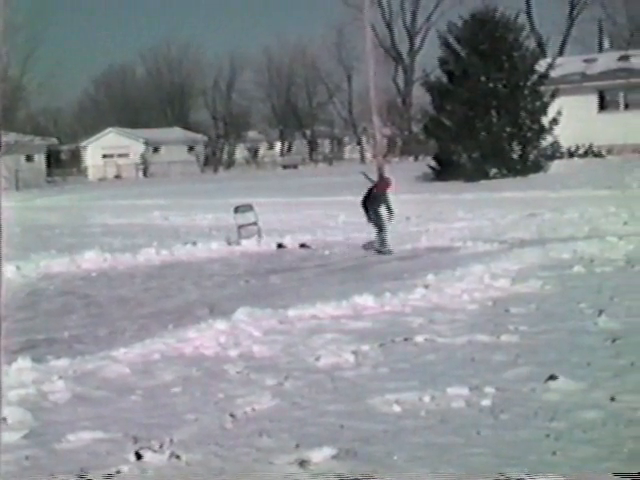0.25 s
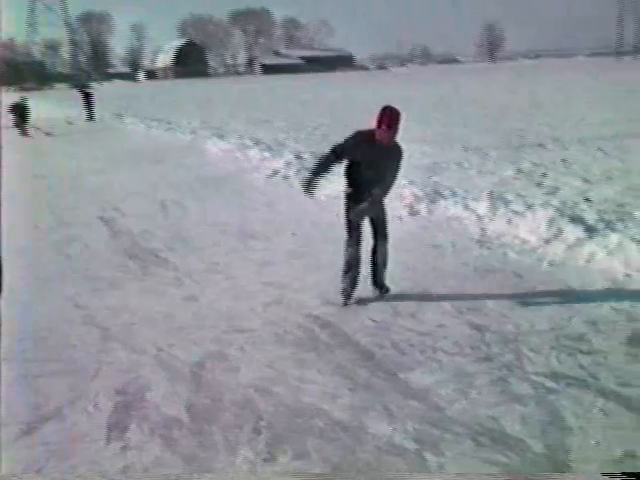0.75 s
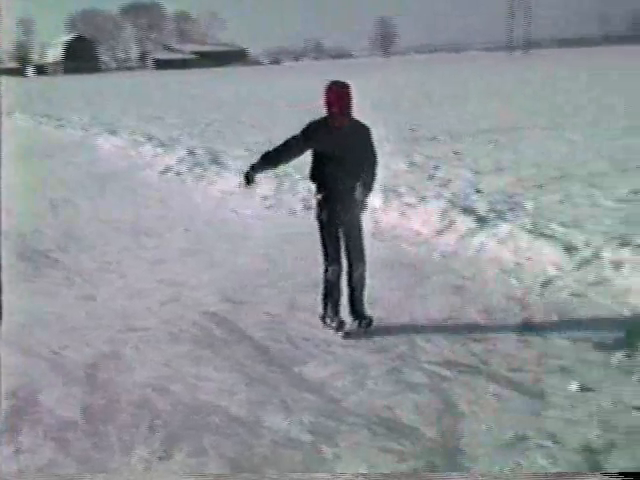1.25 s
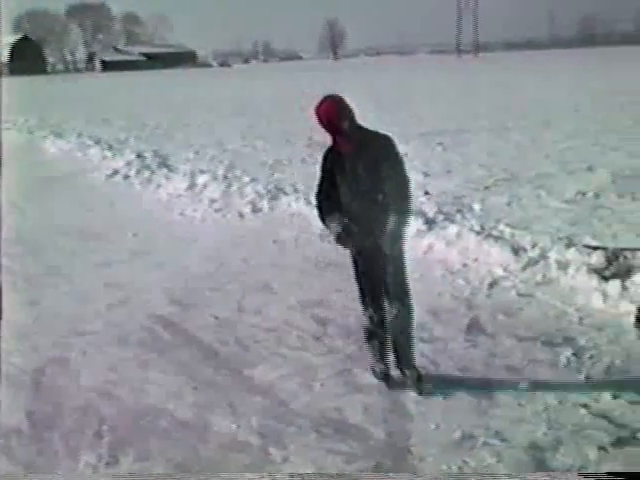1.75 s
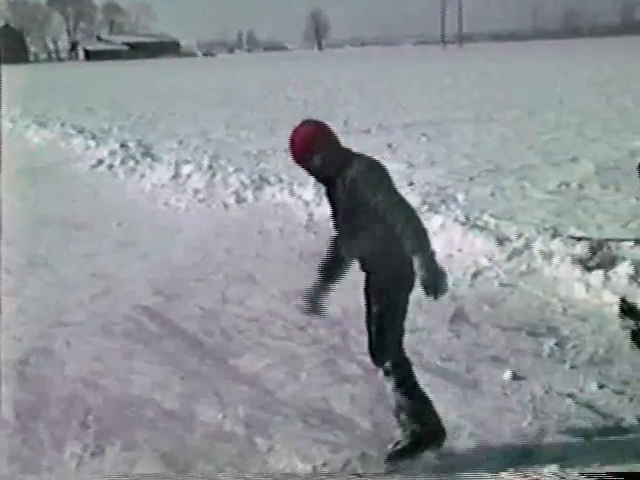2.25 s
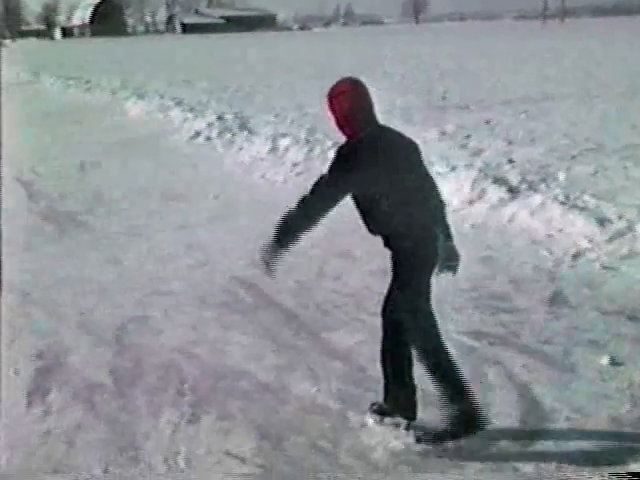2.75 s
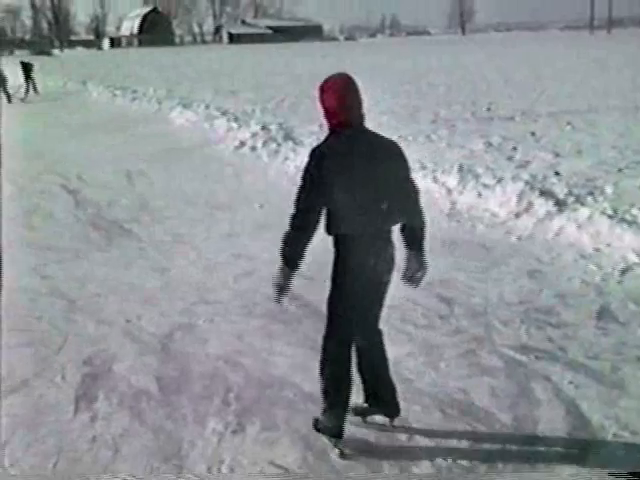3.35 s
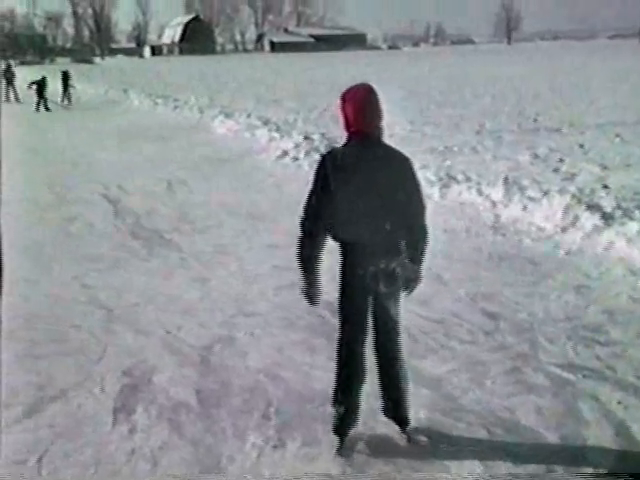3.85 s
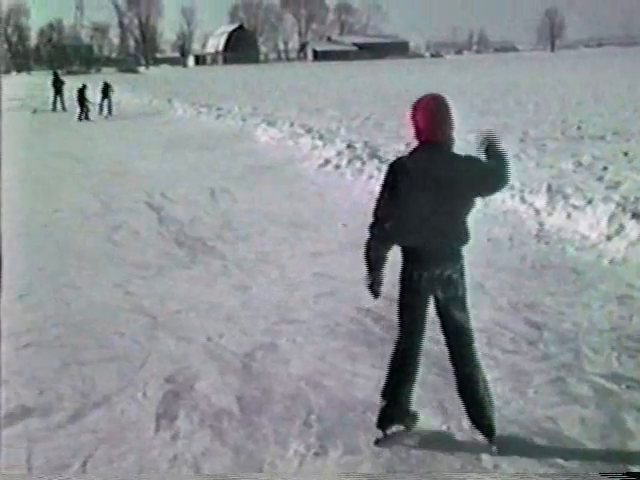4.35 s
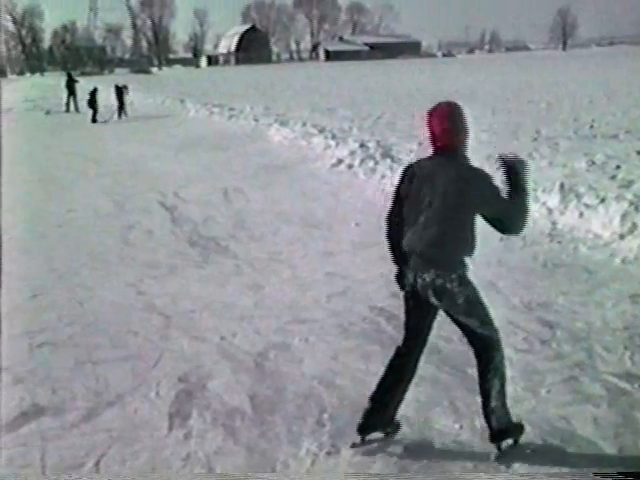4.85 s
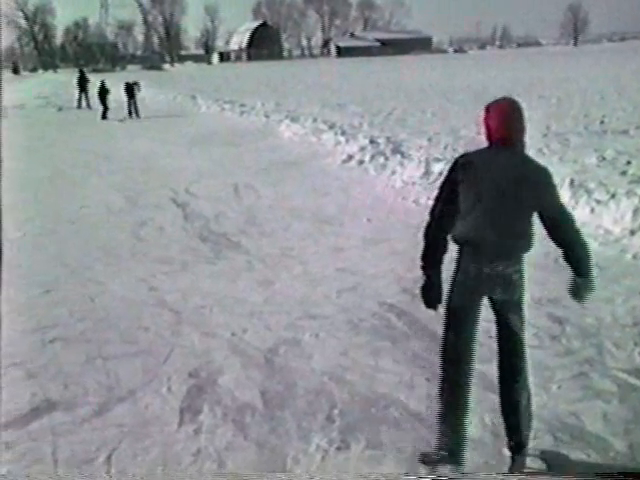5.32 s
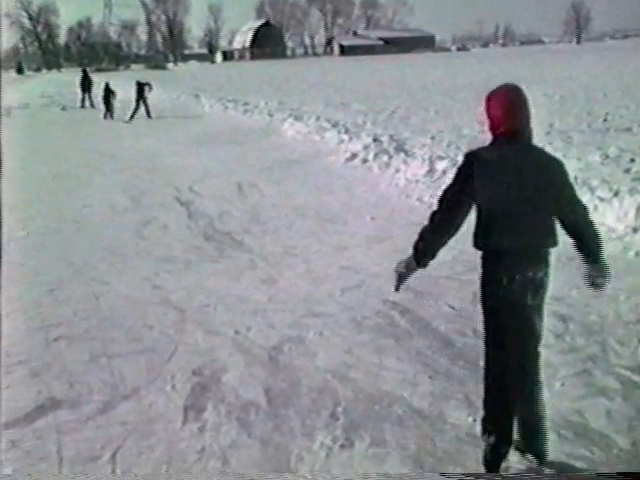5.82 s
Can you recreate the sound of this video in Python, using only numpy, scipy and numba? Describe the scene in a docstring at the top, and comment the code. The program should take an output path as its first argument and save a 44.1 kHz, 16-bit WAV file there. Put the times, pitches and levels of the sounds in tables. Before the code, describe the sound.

Metal blades rasp on bumpy ice, close and dry, without echo. Faint scratching grows into thumping steps and one loud crunchy carve, eases to thin shaving, then becomes a run of short knocking strokes. Bright hard cracks ring out late, followed by a few more scrapes. Behind are soft wind rumble, distant open-country noise, hiss and a thin steady whine from an old tape camcorder.

```python
"""A skater shuffles and carves over rough pond ice a few metres from a tape camcorder on an open snowy field.
Soft shaving and a first step lead to a strong carve after two seconds, then to shorter, knocking strokes.
Sharp cracks ring out just after five seconds, and the last strokes follow. The blade sounds are noise through
resonances of ice, boot and blade; knocks and cracks are short blows that ring. All the way through there are
light wind and far country noise (filtered noise), tape hiss, and thin whine and drive tones (sine waves)."""
import sys
import numpy as np
from scipy import signal
from scipy.io import wavfile
from scipy.ndimage import uniform_filter1d
from numba import njit

SR = 44100
rng = np.random.default_rng(int(sys.argv[2]) if len(sys.argv) > 2 else 0)


def put_to_file(sound):
    """Save the sound as 16-bit audio at rate SR, in the file named by the first command-line argument."""
    columns = np.atleast_2d(sound).T  # one column per channel
    safe = np.clip(columns, -1, 1)
    whole_steps = np.round(safe * 32767)
    wavfile.write(sys.argv[1], SR, whole_steps.astype(np.int16))


N = 268282  # length in samples

# Resonances of the ice sheet, the boot, and the ice that the blade crushes, shaves and sprays.
# Columns: pitch_hz [Hz], base_width_hz [Hz, widened where used], level_db [dB, relative]
SHEET = [(171, 86, -9.5), (284, 102.5, -4.5), (340.6, 76, -0.5), (413, 74, -4.5)]
BOOT = [(663, 110, 1), (826.6, 180, -2)]
CRUST = [(1116, 180, 2), (1506, 300, 0), (2133, 490, -5.5), (2657, 370, -11)]
POWDER = [(3230, 317, 2.5), (4010, 350, 0.5), (4470, 150, 3), (4740, 250, -11)]
SPRAY = [(5630, 800, 2), (7270, 1100, -8.5), (8600, 1700, -8)]


def undb(db):
    """Turn decibels into a gain."""
    return 10 ** (np.asarray(db) / 20)


def level(x, db):
    """Scale a sound to an rms (average strength) level."""
    return x * undb(db) / np.sqrt(np.mean(x ** 2))


@njit
def svf(x, hz, width):
    """Let one band through: a state-variable filter whose centre may move, with gain 1 at the centre."""
    y = np.empty(len(x))
    band, low = 0., 0.
    for i in range(len(x)):
        g = np.pi * hz[i] / SR
        g += g ** 3 / 3  # close to tan(g)
        damping = width / hz[i]
        v = (band + g * (x[i] - low)) / (1 + g * (g + damping))
        band = 2 * v - band
        low = low + 2 * g * v
        y[i] = damping * v
    return y


def svf_twice(x, centre, width):
    """Pass the same band filter twice, for steeper sides."""
    return svf(svf(x, centre, width), centre, width)


def walk(rate):
    """Wander at random: levels held for 1 / rate seconds, then smoothed twice; spread near 1."""
    hold = max(int(SR / rate), 1)
    steps = np.repeat(rng.standard_normal(N // hold + 1), hold)
    smoothed = uniform_filter1d(uniform_filter1d(steps, hold), hold)
    return 1.23 * smoothed[:N]


def add(out, s, sound, db):
    """Mix a sound in at a time in seconds, scaled to a peak level."""
    start = int(s * SR)
    n = min(len(sound), N - start)
    out[start:start + n] += sound[:n] * undb(db) / np.abs(sound).max()


def glide():
    """The blade bumps over ridges: one shared judder shakes all layers, the spray hardest and the powder least."""
    settle_db = -33  # under a thud near this loud the blade bites in and judders less
    settled = 0.5    # share of the judder left under a very loud thud
    gains = strokes()
    pressure = (gains[0] / undb(settle_db)) ** 2
    judder = walk(90) * (settled + (1 - settled) / (1 + pressure))

    ridges = grains(800, 2.53, 0.59)
    chips = grains(3000, 2.3, 0.75)

    def layer(judder_db, source, peaks, drift, sway_db):
        return level(undb(judder_db * judder) * body(source, peaks, drift, sway_db), 0)

    thud = layer(2.4, ridges, SHEET, 0.012, 1.4)
    boot = layer(2.6, ridges + 0.37 * chips, BOOT, 0.038, 2.2)
    crust = layer(2.2, 0.59 * ridges + chips, CRUST, 0.058, 0.95)
    powder = layer(1.93, chips, POWDER, 0.021, 3.0)
    spray = layer(2.96, chips, SPRAY, 0.0089, 0.84)
    return (gains * np.array([thud, boot, crust, powder, spray])).sum(axis=0)


def strokes():
    """Gain of each layer over all strokes; the blade lands and lifts within a few milliseconds."""
    # Blade on the ice, one list a stroke; levels are before the microphone.
    # Columns: time_s [s], thud_db [dB], powder_db [dB], spray_db [dB]
    stroke_levels = [
        [(0.0, -67, -72, -70), (0.05, -74, -58, -76), (0.158, -65, -49.5, -55), (0.258, -47, -54, -65),
         (0.328, -46, -50.5, -47.5), (0.59, -48.5, -44, -53), (0.645, -51, -54, -62)],
        [(0.815, -38, -42, -49), (0.831, -50, -51.5, -66), (0.938, -29, -55, -66)],
        [(0.945, -44, -73, -76), (0.957, -54, -58.5, -72), (1.21, -59, -57, -71)],
        [(1.21, -46, -53, -76), (1.224, -45, -70, -76), (1.372, -53, -49, -54), (1.506, -31.5, -53.5, -57.5),
         (1.69, -53, -44, -53.5), (1.73, -36.5, -40.5, -47)],
        [(1.745, -43, -40, -56), (1.757, -49.5, -45.5, -60), (1.869, -45, -57.5, -68), (1.963, -31, -45, -52),
         (2.033, -43.5, -54, -56), (2.055, -35, -48, -58)],
        [(2.055, -39, -55, -55), (2.063, -33, -46, -43.5), (2.115, -33, -47.5, -43.5), (2.361, -23.5, -32, -32),
         (2.431, -25.5, -36, -36.5), (2.472, -33.5, -38.5, -40)],
        [(2.478, -38, -50, -54), (2.542, -51.5, -55, -61), (2.676, -47.5, -44.5, -43.5), (2.786, -59, -49, -65),
         (2.868, -61, -53, -76), (2.89, -65, -58, -74)],
        [(2.905, -56, -41.5, -51), (2.933, -38, -40, -37.5), (3.025, -50.5, -49, -58), (3.23, -45, -49.5, -56)],
        [(3.235, -35.5, -43, -55), (3.313, -31.5, -38, -53), (3.351, -34.5, -43, -54),
         (3.432, -32.5, -41.5, -52)],
        [(3.455, -37.5, -49.5, -64), (3.621, -35.5, -45, -49), (3.895, -37, -49.5, -66), (3.925, -34, -51, -60)],
        [(4.09, -45, -66, -76), (4.176, -43, -55, -74), (4.19, -39.5, -45, -63), (4.275, -38, -65, -76)],
        [(4.28, -31.5, -55, -63), (4.514, -35.5, -44.5, -51), (4.58, -46.5, -35.5, -42), (4.59, -50, -45, -63)],
        [(4.62, -43.5, -54, -60), (4.702, -35.5, -56.5, -68), (4.74, -51, -63, -69)],
        [(4.76, -57, -63, -83), (4.822, -35.5, -45, -46.5), (4.915, -40, -45, -47.5)],
        [(4.93, -56, -50, -57), (5.0, -44, -48, -50), (5.04, -48, -45, -48)],
        [(5.07, -30, -44, -47), (5.156, -59, -51.5, -54), (5.16, -45, -46, -56)],
        [(5.19, -56, -46, -64), (5.222, -43, -52.5, -60), (5.538, -46, -51, -50), (5.55, -43.5, -45, -40.5),
         (5.718, -38, -44, -48), (5.748, -28.5, -44, -50), (5.77, -30, -51, -66)],
        [(5.87, -40, -64, -67), (5.886, -45.5, -47.5, -62), (6.064, -49, -50.5, -52), (6.08, -50, -41, -61)],
    ]
    # Colour of each stroke, same order, added to its mix of thud and powder.
    # Columns: boot_db [dB], crust_landing_db [dB], crust_liftoff_db [dB]
    stroke_colours = [(-6, -5.5, 6), (1.5, 4.5, -2), (-7, 3, -3), (-5, -8.5, 2.5), (-4.5, 1, 5.5),
                      (-3, 3.5, 0), (-1.5, 3, 3), (-5.5, -0.5, 1.5), (-4, -4.5, -1.5), (-3, -1, -1),
                      (-1, 2, 1), (2.5, 1, -1.5), (3, -4, -2), (-3.5, -5, -3.5), (-2, -0.5, 2), (1, 0, 6),
                      (-8, 0.5, 0), (0, -1, 3.5)]
    # share of the thud in these layers' dB level; the powder gives the rest
    boot_weight, crust_weight = 0.7, 0.34

    t, gains = np.arange(N) / SR, 0
    for stroke, (boot_db, *crust_ends_db) in zip(stroke_levels, stroke_colours):
        s, thud, powder, spray = np.transpose(stroke)
        boot = boot_weight * thud + (1 - boot_weight) * powder + boot_db
        crust = crust_weight * thud + (1 - crust_weight) * powder
        crust = crust + np.interp(s, s[[0, -1]], crust_ends_db)
        layers_db = thud, boot, crust, powder, spray
        layer_gains = np.array([undb(np.interp(t, s, db)) for db in layers_db])
        on_ice = (t >= s[0]) & (t < s[-1])
        gains = gains + layer_gains * on_ice
    return uniform_filter1d(gains, int(0.0072 * SR), axis=1)


def grains(rate, spread_db, smooth):
    """Scattered breaks of very unequal size (rate per second) over a smooth rubbing noise."""
    hit = rng.random(N) < rate / SR
    size = undb(spread_db * rng.exponential(size=N))
    sign = rng.choice([-1., 1.], N)
    return level(hit * size * sign, 0) + smooth * rng.standard_normal(N)


def body(x, peaks, drift, sway_db):
    """Steep resonances that wander and swell a little as the blade's edge and angle change."""
    out = 0
    for k, (hz, width, db) in enumerate(peaks):
        centre = hz * (1 + drift * walk(6.7))
        gain = (-1) ** k * undb(db + sway_db * walk(9))  # neighbours have opposite sign
        out = out + gain * svf_twice(x, centre, 1.61 * width)
    return out


def knocks():
    """Each step or chip pushes the same resonances, damped by the weight on the blade."""
    # Steps and chips; peak levels are before the microphone.
    # Columns: crest_s [s], thud_db [dB], crust_db [dB], powder_db [dB, also covers the spray]
    knock_list = [(0.7217, -49, -40, -37), (0.813, -30, -37, -26), (0.8952, -18.5, -26, -42),
                  (0.9031, -26, -26, -41), (0.9252, -11.5, -19.5, -26.5), (0.933, -23.5, -38, -45),
                  (1.2236, -29.5, -47, -49), (1.2433, -27, -42, -43), (1.312, -32, -51, -37),
                  (1.5139, -21, -32, -40), (1.7345, -17.5, -22, -32), (1.8218, -27, -41, -44),
                  (1.89, -30, -34, -41), (2.0649, -27, -27, -41), (2.581, -37, -49, -31.5),
                  (2.7182, -44, -36, -29.5), (2.897, -54, -34, -25), (3.2891, -19.5, -52, -32),
                  (3.304, -22, -40, -32), (3.315, -20, -29, -33), (3.4331, -22.5, -43, -44),
                  (3.4487, -24, -34, -38), (3.51, -21, -29.5, -36), (3.5336, -19.5, -40, -35),
                  (3.758, -30, -49, -46), (3.9558, -51, -26.5, -46), (4.0813, -26.5, -42, -36),
                  (4.122, -50, -38, -39), (4.143, -30, -36, -45), (4.162, -34, -28.5, -48),
                  (4.194, -51, -21, -38), (4.2162, -24, -46, -53), (4.2825, -23, -35, -39),
                  (4.3259, -31, -28.5, -42), (4.3408, -22.5, -35, -36.5), (4.406, -23.5, -48, -47),
                  (4.465, -21.5, -26, -41), (4.646, -30, -28.5, -41), (4.6967, -26, -43, -40),
                  (4.7663, -44, -38, -40), (4.8196, -23, -45, -42), (4.897, -27, -38, -41),
                  (5.0763, -18.5, -48, -22.5), (5.1042, -20.5, -32, -34), (5.6578, -25, -40, -25),
                  (5.7277, -26, -25, -36), (5.891, -36, -27, -36), (5.9355, -35, -22, -40)]
    crunch_t60_s = 0.0085  # time for the crunch to fade by 60 dB
    boot_offset_db, thud_share = -3, 0.27  # boot level: a mix of thud and crust dB, plus an offset

    out = np.zeros(N)
    for s, thud_db, crust_db, powder_db in knock_list:
        blow = burst(crunch_t60_s, 0.277)
        boot_db = thud_share * thud_db + (1 - thud_share) * crust_db + boot_offset_db
        layers = ((SHEET, thud_db), (BOOT, boot_db), (CRUST, crust_db), (POWDER + SPRAY, powder_db))
        for peaks, db in layers:
            rung = 0
            for hz, width, peak_db in peaks:
                centre = np.full(len(blow), float(hz))
                # a heavier body is pushed for longer, so its ring starts softly
                push_shape = np.hanning(int(.8 * SR / hz) + 3)
                push = np.convolve(blow, push_shape)[:len(blow)] * hz
                rung = rung + undb(peak_db) * svf_twice(push, centre, 2.3 * width)
            # low waves run ahead through the ice: every layer crests at the same moment
            crest_delay_s = np.argmax(np.abs(rung)) / SR
            add(out, s - crest_delay_s, rung, db)
    return out


def burst(t60, crunch):
    """One clean blow followed by a crunch of noise that fades by 60 dB in t60 seconds."""
    t = np.arange(2048) / SR
    blow = crunch * rng.standard_normal(2048) * 10 ** (-3 * t / t60)
    blow[0] = 1
    return blow


def cracks():
    """A hard hit, as of a stick on hard ice: a sharp click, then a rattle that holds briefly and stops."""
    # Hits; peak levels are before the microphone.
    # Columns: start_s [s], level_db [dB], rattle_s [s]
    hits = [(5.0496, -1.5, 0.013), (5.1658, -9, 0.0043), (5.1765, -14.5, .003), (5.182, -22, 0.013)]
    # Ringing tones of a hit. Columns: pitch_hz [Hz], level_db [dB, relative], t60_s [s to fade by 60 dB]
    modes = [(1085, -5, 0.049), (1320, 1, 0.032), (1520, 1, 0.022), (1700, 2, 0.019), (1906, 2, 0.024),
             (2145, 1.5, 0.014), (2356, 0, 0.021), (2670, 4, 0.011), (3050, 3.5, 0.019), (3340, 7.5, 0.013),
             (3620, -1, 0.0072), (4030, 9, 0.0085), (4010, 1, 0.012), (5140, -24, 0.012),
             (5850, -10, 0.014)]

    out, t = np.zeros(N), np.arange(4096) / SR
    for s, db, rattle_s in hits:
        push = 0.2 * rng.standard_normal(4096) * np.exp(-(t / rattle_s) ** 3)
        push[0] = 1
        add(out, s, ring(push, modes), db)
    return out


def ring(x, modes):
    """Send a short push through tones that die away, as a struck solid does."""
    t = np.arange(len(x)) / SR
    response = 0
    for hz, db, t60 in modes:
        response = response + undb(db) * np.sin(2 * np.pi * hz * t) * 10 ** (-3 * t / t60)
    return signal.fftconvolve(x, response)[:len(x)]


def field():
    """Far noise in half-octave bands that swell together and flicker alone, plus wind rumble."""
    # Colour of the far noise. Columns: pitch_hz [Hz], level_db [dB, relative]
    colour = np.array([(60, -1), (120, 4), (300, 0), (700, -6.5), (1500, -11.5), (2500, -4.5), (4000, -43),
                       (6000, -64), (8000, -59)])
    # Level of the wind before its gusts. Columns: time_s [s], level_db [dB]
    wind_levels = [(0.0, -51), (0.6, -47), (0.9, -47), (1.0, -55.5), (6.08, -54.5)]
    far_db, gust_db = -47, 1

    far, swell = 0, walk(1.644)
    for hz in 60 * 2 ** np.arange(0, 7.1, .5):
        band_db = np.interp(np.log(hz), np.log(colour[:, 0]), colour[:, 1])
        band_db = band_db + 4.9 * swell + 1.9 * walk(5.4)
        far = far + undb(band_db) * svf(rng.standard_normal(N), np.full(N, hz), hz / 3.7)

    wind_s, wind_db = np.transpose(wind_levels)
    wind_db = np.interp(np.arange(N) / SR, wind_s, wind_db) + gust_db * walk(2.76)
    rumble = level(svf(rng.standard_normal(N), np.full(N, 70.), 58.0), 0)
    wind = undb(wind_db) * rumble

    # faint low noise of opposite sign makes the two tracks a little unlike
    unlike = level(svf_twice(rng.standard_normal(N), np.full(N, 60.), 115.0), -72.0)
    return level(far, far_db) + wind + unlike * np.array([[1], [-1]])


def scene():
    """The skater through a microphone deaf to deep bass and high treble, without echo, plus the field noise."""
    mic_low_hz, mic_top_hz = 187, 6830
    mic = signal.butter(4, [mic_low_hz, mic_top_hz], "band", fs=SR, output="sos")
    skater = glide() + knocks() + cracks()
    return signal.sosfilt(mic, skater) + field()


def tones(lines, t):
    """Add up steady sine waves, each at its rms level."""
    return sum(np.sqrt(2) * undb(db) * np.sin(2 * np.pi * hz * t) for hz, db in lines)


def record(dry):
    """Add tape hiss, wavering drive tones and scan whine, cut the top steeply, and offset each track."""
    # Thin picture-scan whine in close lines. Columns: pitch_hz [Hz], level_db [dB rms]
    whine_lines = [(15254, -92), (15315, -93), (15375, -87), (15434, -87)]
    # Faint tones of the tape drive. Columns: pitch_hz [Hz], level_db [dB rms]
    drive_lines = [(1922, -69), (2339, -64), (2519, -64.5)]
    # Constant offset, one row a track. Column: offset [share of full scale]
    track_offset = np.array([
        [-.0202],
        [-.008],
    ])
    hiss_db, hiss_top_hz, top_hz = -60, 13700, 15560
    wow_s = 0.0001  # typical size of the drive's slow time wobble

    hiss_filter = signal.butter(6, hiss_top_hz, fs=SR, output="sos")
    hiss = level(signal.sosfilt(hiss_filter, rng.standard_normal(N)), hiss_db)
    t = np.arange(N) / SR
    whine = tones(whine_lines, t)
    drive = tones(drive_lines, t + wow_s * walk(5))
    top = signal.ellip(10, .2, 80, top_hz, fs=SR, output="sos")
    return signal.sosfilt(top, dry + hiss + whine + drive) + track_offset


dry = scene()
out = record(dry)
put_to_file(out)
```